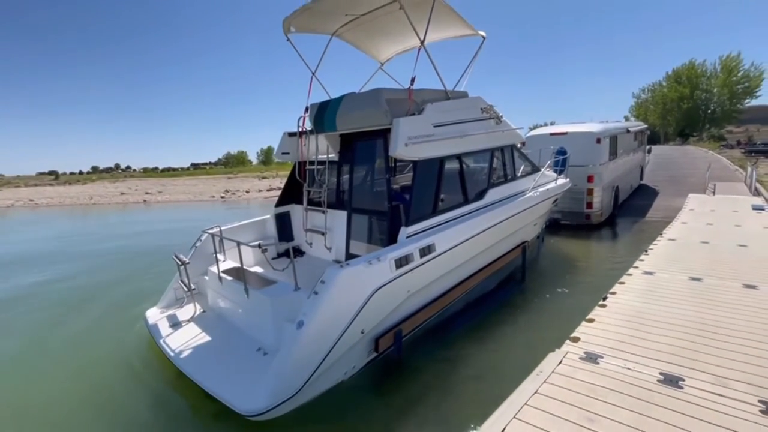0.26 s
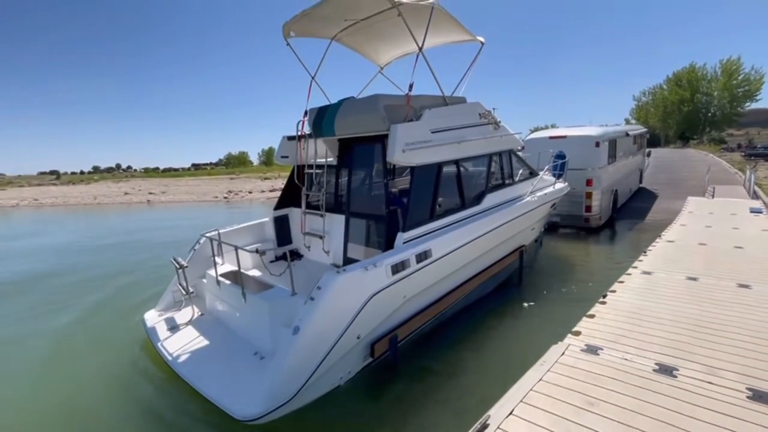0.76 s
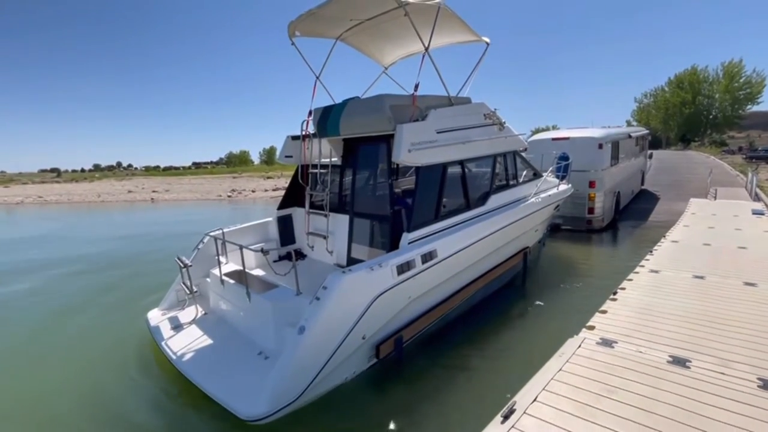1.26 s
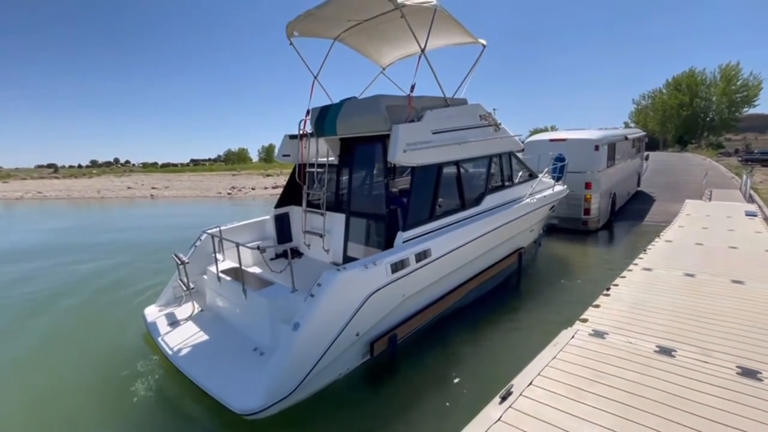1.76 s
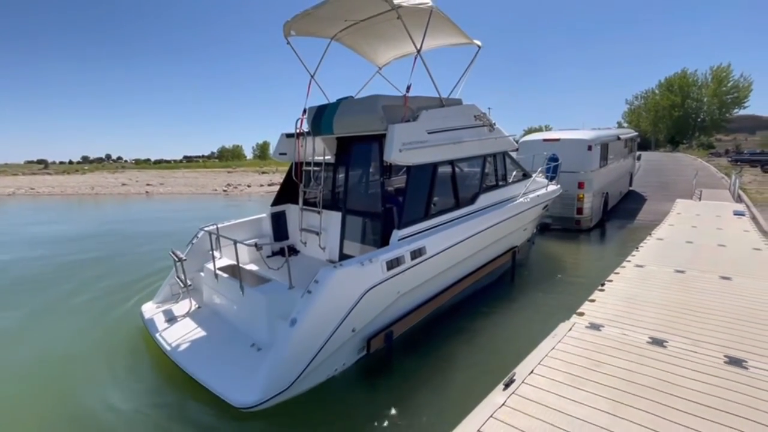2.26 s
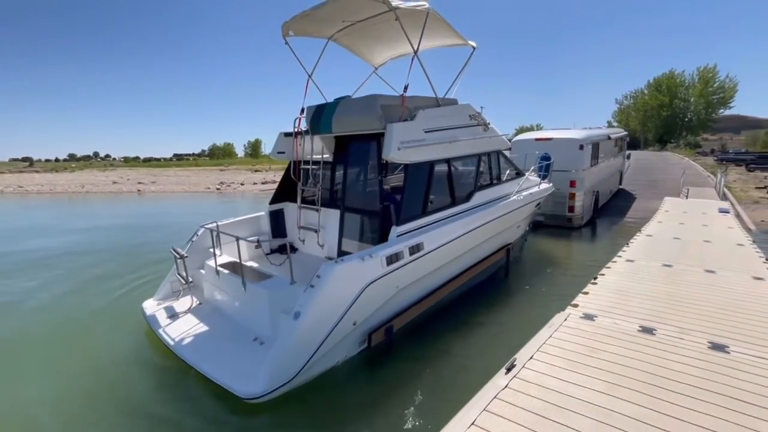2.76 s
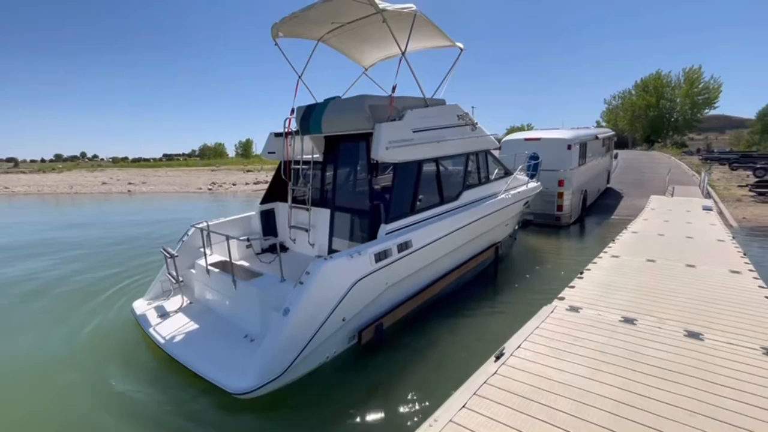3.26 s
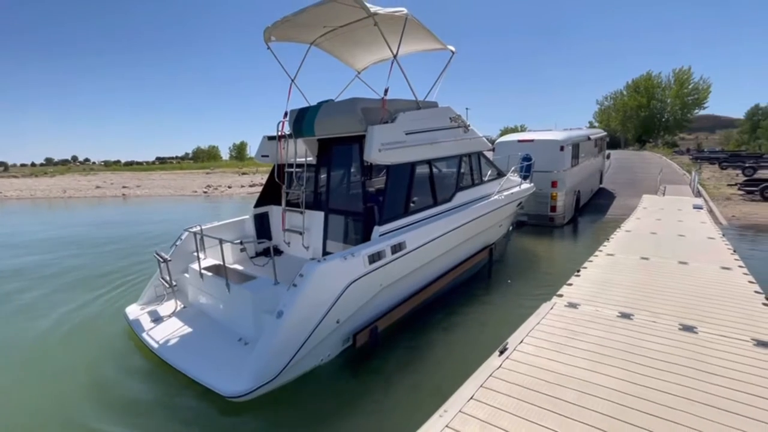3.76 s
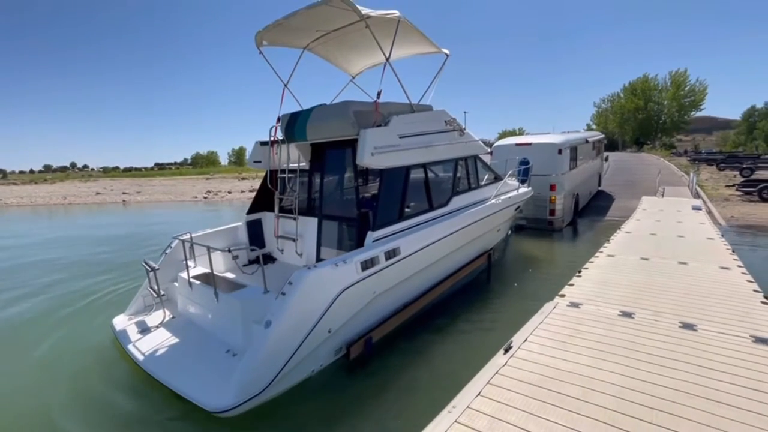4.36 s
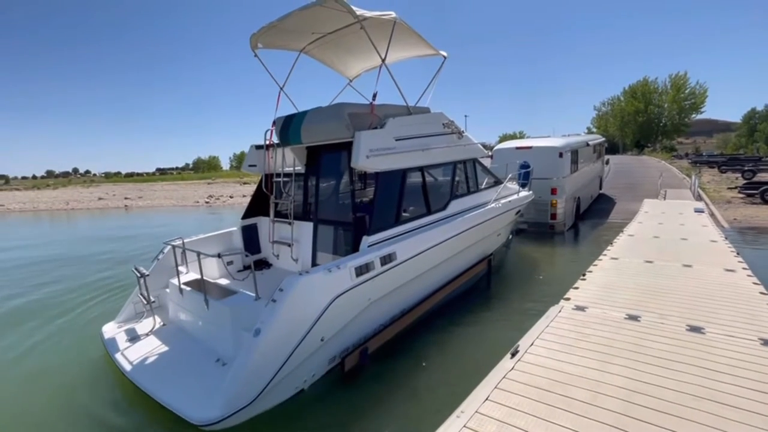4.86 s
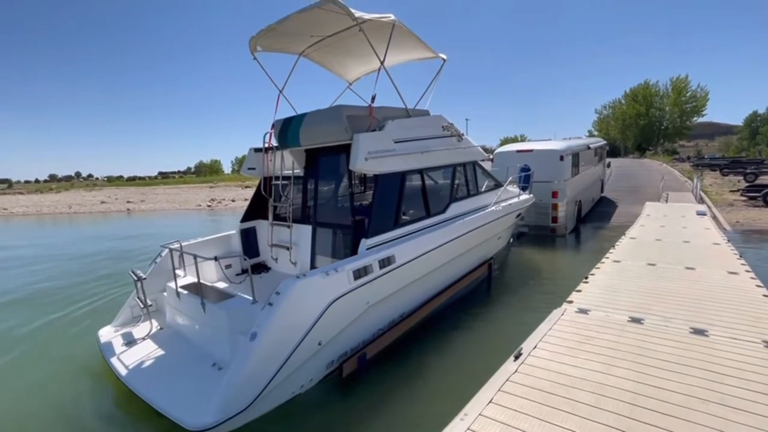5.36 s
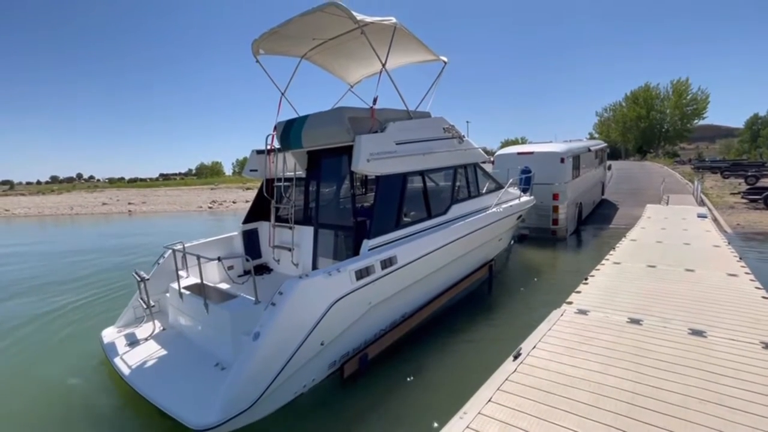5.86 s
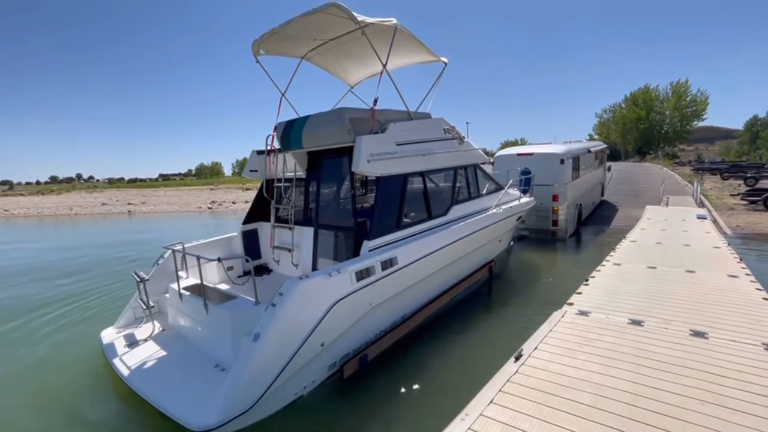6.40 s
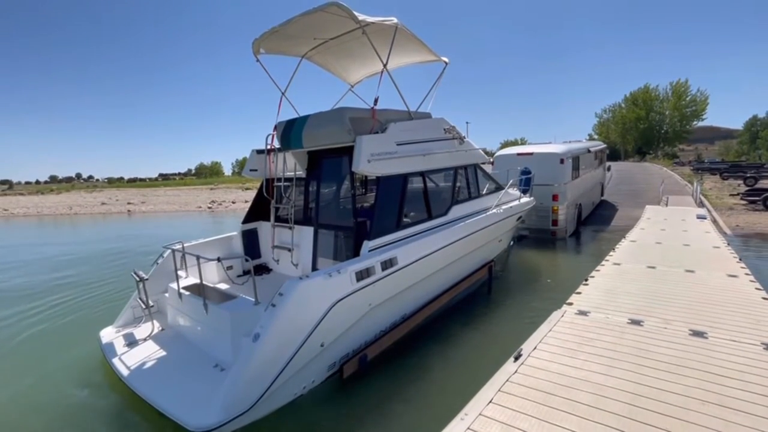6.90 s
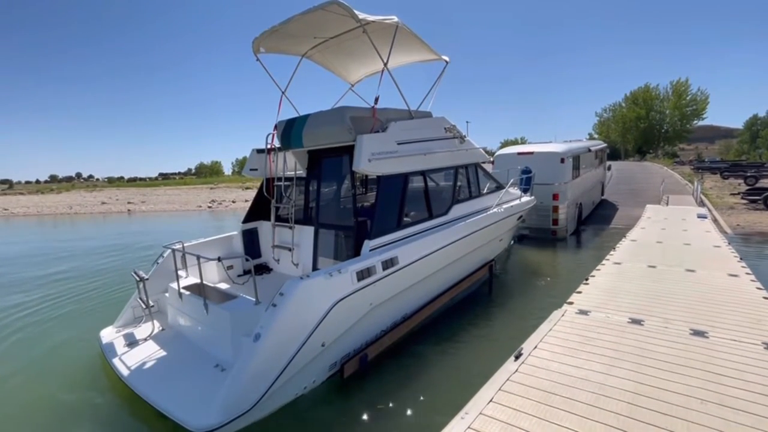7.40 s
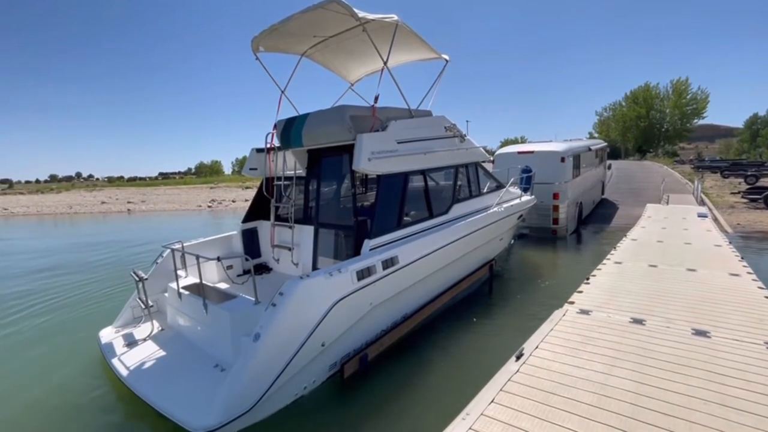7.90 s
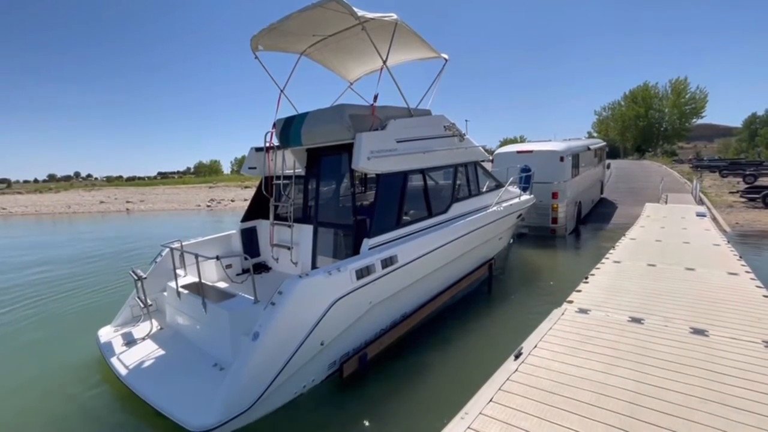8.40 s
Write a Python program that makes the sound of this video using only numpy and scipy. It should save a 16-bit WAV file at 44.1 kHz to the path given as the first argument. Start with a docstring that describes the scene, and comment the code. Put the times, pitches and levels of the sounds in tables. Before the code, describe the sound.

Outdoors by the water, a big engine keeps up a throbbing idle with mechanical clatter and fan hiss, joined by a pump's whine and a more distant vehicle's low mutter. About a third of the way in, air brakes nearby blast and squeal downward, followed by a few rough squeaks and another, steadier hiss. Water ticks faintly against a hull and loose metal rattles lightly before the engine slows and fades.

```python
"""A large engine idles fast at a boat ramp and runs down near the end, its six cylinders beating in the
exhaust over clatter and fan hiss. Farther up the ramp the tow vehicle mutters. A hydraulic pump whines,
loose fittings rattle and water ticks against the hull. An air brake dumps, its squeal falling with the
pressure; the linings rub and squeak, and a valve vents a second time.
Open air, heard through two closely spaced microphone ports."""
import sys
import numpy as np
from scipy import signal
from scipy.fft import rfft, irfft
from scipy.io import wavfile

SR = 44100
rng = np.random.default_rng(int(sys.argv[2]) if len(sys.argv) > 2 else 0)


def store_pcm(level_fs):
    """Save levels as 16-bit WAV."""
    pcm = np.round(np.clip(level_fs, -1, 1) * 32767).astype(np.int16)
    wavfile.write(sys.argv[1], SR, np.atleast_2d(pcm).T)


N = 381024
T = np.arange(N) / SR
HZ = np.fft.rfftfreq(N, 1 / SR)

# engine speed before the run-down: time_s, four_stroke_cycles_per_s
ENGINE_SPEED = [(0, 12.68), (2.65, 12.6895), (3.2, 12.8287), (4.2, 12.8347), (5.2, 12.7443), (7.7, 12.7401)]
# the six exhaust blows: place_in_cycle (0-1), strength (factor)
BLOWS = [(0.033, 0.58), (0.209, 0.85), (0.378, 0.71), (.537, 0.34), (0.712, 0.66), (0.874, 0.28)]
# load on the machinery, easing as the rig comes to rest: time_s, load_db
MACHINE_LOAD = [(0, 0), (1.3, -1.6), (2, -2.5), (2.8, -2), (4.5, -2), (5.3, -5.5), (6.5, -7.5), (8.64, -8)]
# noise of rubbing linings and rattling metal: frequency_hz, level_db, left_minus_right_db
METAL_SPECTRUM = [(900, -16.5, -3.5), (1300, 8.5, 10.5), (1900, -9.5, -17.5), (2390, 5, -9.5),
                  (2950, -10.5, -1.5), (3600, 1, 1.5), (4500, -9, 9.5), (5930, -18.5, 8), (10000, -53.5, 1)]
CLOSE_S, SHUT_S = 7.79, 0.03  # the throttle starts to close; time it takes to shut
DUMP_S, DUMP_RISE_S, DRAIN_S = 2.908, .067, .245  # brake valve opens; jet builds; pressure time constant


def amp(db):
    """Decibels as an amplitude factor."""
    return 10 ** (np.asarray(db) / 20)


def unit(x):
    """The signal scaled to rms 1."""
    return x / np.sqrt(np.mean(x ** 2) + 1e-20)


def curve(rows):
    """A table as a line through time."""
    return np.interp(T, *np.transpose(rows))


def since(start):
    """Seconds gone since a moment, zero before it."""
    return np.maximum(T - start, 0)


def progress(start, length):
    """Runs from 0 to 1 over an event."""
    return np.clip((T - start) / length, 0, 1)


def gate(start, length, attack, release):
    """Smooth attack, hold and release, timed in seconds."""
    fade_in = np.sin(np.pi / 2 * progress(start, attack))
    fade_out = np.cos(np.pi / 2 * progress(start + length - release, release))
    return (fade_in * fade_out) ** 2


def bell(peak_s, half_width_s):
    """A rounded swell of height 1."""
    return np.exp(-((T - peak_s) / half_width_s) ** 2)


def bursts(rows, rise_share=0.59):
    """Envelope of small events that swell quickly and die away."""
    return sum(amp(db) * np.exp(-np.maximum(T - s, (s - T) / rise_share) / decay)
               for s, db, decay in rows)


def wander(rate_hz):
    """Smooth random drift of rms 1."""
    return unit(irfft(rfft(rng.standard_normal(N)) * np.exp(-(HZ / rate_hz) ** 2), N))


def tone(hz, jitter, jitter_hz):
    """A sine of rms 1 whose pitch trembles."""
    trembling_hz = hz * (1 + jitter * wander(jitter_hz))
    return np.sqrt(2) * np.sin(2 * np.pi * np.cumsum(trembling_hz) / SR)


def colour(rows, column=1):
    """One column of a table across log frequency."""
    columns = np.transpose(rows)
    return np.interp(np.log(HZ + 1), np.log(columns[0] + 1), columns[column])


def shaped(x, spectrum):
    """The signal filtered by a spectrum, at rms 1."""
    return unit(irfft(rfft(x) * amp(colour(spectrum)), N))


def lift_db(bands):
    """Gain of a set of peaks and notches across frequency."""
    return sum(db * np.exp(-(2 * (HZ - centre) / width) ** 2) for centre, width, db in bands)


def ringing(x, modes):
    """Lifts the sound around each resonance."""
    return irfft(rfft(x) * amp(lift_db(modes)), N)


def reflected(x):
    """Short echoes comb the sound into narrow ridges."""
    # returns off hull, ramp and dock: delay_s, strength (factor)
    echoes = [(.0008, 0.14), (.0027, 0.25), (.0061, 0.23), (0.0112, .2), (.019, 0.16)]
    comb = 1 + sum(strength * np.exp(-2j * np.pi * HZ * delay) for delay, strength in echoes)
    return irfft(rfft(x) * comb, N)


def microphone(x, balance_db, diffuse=True):
    """The left side hears later and wide noise is only partly alike in the two; above about 11 kHz the two
    sides are made nearly the same."""
    # likeness and lag of left and right: frequency_hz, coherence (0-1), left_lag_rad
    likeness = [(0, .92, 0), (150, .97, .24), (400, .93, .62), (750, .88, 1.1), (1100, .87, 1.7),
                (1500, .85, 2.4), (2070, .7, 3), (2550, .67, 5.2), (4600, .6, 10.5), (6300, .5, 17.5),
                (8100, .45, 16.7), (11800, .99, 18.85)]
    hz, coherence, lag = np.transpose(likeness)
    right = rfft(x)
    left = right * np.exp(-1j * np.interp(HZ, hz, lag))
    if diffuse:
        alike = np.interp(HZ, hz, coherence)
        scattered = abs(right) * np.exp(2j * np.pi * rng.random(len(HZ)))
        left = alike * left + np.sqrt(1 - alike ** 2) * scattered
    tilt = amp(balance_db)  # left over right
    return irfft(np.array([left * tilt, right]) * np.sqrt(2 / (1 + tilt ** 2)), N)


def hiss(spectrum):
    """Coloured noise with its echoes, rms 1 across left and right."""
    noise = shaped(reflected(rng.standard_normal(N)), spectrum)
    return microphone(noise, colour(spectrum, column=2))


def load_db(full_load_db, db_per_load_db):
    """A layer's level as it follows the load."""
    return full_load_db + db_per_load_db * curve(MACHINE_LOAD)


def run_down_db(step_db=-3.5, fade_db_per_s2=-11.5):
    """The engine drops a step as the throttle shuts, then fades ever faster."""
    return step_db * progress(CLOSE_S, SHUT_S) + fade_db_per_s2 * since(CLOSE_S) ** 2


def dip_db():
    """The level of both engines dips briefly."""
    return -4.5 * bell(peak_s=3.166, half_width_s=0.22)


def exhaust(cycles, pipe_echo=0.067, loose_db=-32, bark_db=-22, bark_width_cycles=0.013):
    """Six unequal push-pull blows a cycle set the phase of each order; the pipe sets its strength."""
    # what the pipe lets out: multiple_of_cycle_rate, level_db
    orders = [(3, -48.5), (4, -50), (5, -45), (6, -41.5), (7, -82.5), (9, -32.5), (10, -49.5), (11, -38),
              (12, -19.5), (13, -31), (14, -39), (15, -39.5), (16, -30.5), (17, -39.5), (18, -32.5),
              (19, -37.5), (20, -48.5), (21, -37.5), (22, -31.5), (23, -30), (24, -46), (25, -36.5),
              (26, -45.5), (27, -50), (28, -68), (30, -52), (31, -59.5), (33, -54), (34, -55.5), (35, -43),
              (36, -66), (37, -63.5)]
    place, strength = np.transpose(BLOWS)
    crank = cycles + 0.0025 * wander(52)  # uneven timing
    loose = np.minimum(0.31 * since(CLOSE_S), 1)  # without drive the boom drains and the orders even out
    drone = np.zeros(N)
    for k, db in orders:
        blows = 1j * np.sum(strength * np.exp(-2j * np.pi * k * place))
        blows *= 1 + pipe_echo * np.exp(-1j * np.pi * k / len(place))  # each returns halfway to the next
        level = amp(db + loose * (loose_db - db))
        drone += np.sqrt(2) * level * np.cos(2 * np.pi * k * crank + np.angle(blows))
    drone *= amp(load_db(-0.35, 0.018) + run_down_db() + dip_db() + 0.25 * wander(55))
    # one cylinder still barks after the throttle shuts
    offset = ((crank - place[2] + .5) % 1 - .5) / bark_width_cycles
    bark = -offset * np.exp((1 - offset ** 2) / 2) * amp(bark_db) * progress(CLOSE_S, SHUT_S)
    return microphone(drone + bark, balance_db=-2.9, diffuse=False)


def clatter(cycles, repeat_share=0.73, throb=0.019, sway=.09, lag_cycles=0.073):
    """Valve gear and gas rush, partly repeating each cycle, swell with each firing and crank turn."""
    # mechanical noise: frequency_hz, level_db
    spectrum = [(300, -30), (450, 0), (580, -12), (690, -3.5), (750, -2), (815, 0), (930, 0.5),
                (1060, -6.5), (1200, -7), (1400, -7), (1750, -11), (2100, -15), (4000, -32), (8000, -48)]
    pattern = rng.standard_normal(round(SR / ENGINE_SPEED[0][1]))
    gear_slack = .0012 * wander(9)
    locked = np.interp((cycles + gear_slack) % 1, np.linspace(0, 1, len(pattern)), pattern)
    drive = repeat_share * unit(locked) + (1 - repeat_share) * reflected(rng.standard_normal(N))
    firing = np.cos(2 * np.pi * len(BLOWS) * (cycles - BLOWS[0][0] - lag_cycles))
    crank = np.cos(4 * np.pi * (cycles - BLOWS[2][0]))
    db = load_db(-36, 0.31) + 0.56 * run_down_db() + 0.47 * dip_db() + 0.8 * wander(15)
    swell = (1 + throb * firing + sway * crank) * amp(db)
    return microphone(shaped(drive, spectrum), balance_db=-6) * swell


def cooling_wash(cycles, throb=0.11):
    """Fan and cooling water hiss, pulsing lightly with each crank turn."""
    # the hiss: frequency_hz, level_db, left_minus_right_db
    spectrum = [(500, -3, 31), (1320, 6, 21), (2220, 1, 5.5), (2850, -2, 2.5), (4300, 2, 4.5),
                (4500, -8, 7), (4770, -7, -1.5), (5440, -10.5, 23.5), (6730, -4.5, 6), (7840, -24.5, -6.5),
                (7680, -9, 5), (9820, -18.5, -4), (11000, -35.5, 6), (14400, -29.5, 7.5), (16000, -39, -5)]
    pulse = 1 + throb * np.cos(4 * np.pi * (cycles - .25))
    return hiss(spectrum) * pulse * amp(load_db(-41.5, 0.89) + 0.38 * run_down_db() + .5 * wander(28))


def engine(slowing_hz_per_s=3.81):
    """One crank drives exhaust, clatter and wash, losing speed evenly once the throttle closes."""
    # resonances of the engine covers: centre_hz, width_hz, gain_db
    covers = [(660, 66, 1.5), (866, 50, 1), (1040, 110, 3.5), (1700, 70, 0.5), (3063, 240, 5)]
    cycles = np.cumsum(curve(ENGINE_SPEED) - slowing_hz_per_s * since(CLOSE_S)) / SR
    return exhaust(cycles) + ringing(clatter(cycles) + cooling_wash(cycles), covers)


def tow_engine(rumble_db=-33, waver_db=0.5):
    """A slower engine farther up the ramp: wavering low tones in a rumble."""
    # tones of its idle: pitch_hz, level_db
    idle_tones = [(46, -46.5), (59.5, -37.5), (76, -38.5), (91.5, -37.5), (120, -36)]
    # its rumble: frequency_hz, level_db
    spectrum = [(15, -31.5), (28, -26.5), (42, -12), (62, -8), (100, -16), (130, 9.5), (230, -3), (310, 8),
                (365, -0.5), (450, -9.5), (560, -15), (1200, -73.5)]
    idle = sum(amp(db) * tone(hz, jitter=0.01385, jitter_hz=7.4) * amp(waver_db * wander(4))
               for hz, db in idle_tones)
    idle *= amp(load_db(0.45, 0.24) + dip_db())
    rumble = amp(rumble_db) * shaped(rng.standard_normal(N), spectrum)
    return microphone(idle, balance_db=-4, diffuse=False) + microphone(rumble, balance_db=-1)


def tow_fan():
    """Air from the tow vehicle's fan makes a hollow rush while the vehicle is loaded."""
    # broad resonances: centre_hz, width_hz, gain_db
    resonances = [(775, 170, 0), (906, 140, -0.5), (1735, 200, -3), (2800, 150, -10)]
    gain = sum(amp(db) * np.exp(-2 * ((HZ - hz) / width) ** 2) for hz, width, db in resonances)
    air = unit(irfft(rfft(rng.standard_normal(N)) * gain, N))
    return microphone(air, balance_db=-3) * amp(load_db(-35, 3.7) + 1.6 * wander(11))


def pump(edge_s=0.23, creep_power=1.5):
    """A hydraulic pump sings while it is loaded: each whine swells, eases and creeps up in pitch."""
    # whines, the middle one faint: start_s, length_s, first_hz, last_hz, level_db, swell_db, jitter_share
    whines = [(-.2, 1.6, 407.7, 415.6, -27, 3.5, 0.0024), (1.295, 1.87, 422, 445, -38, 5.5, .03),
              (3.748, 2, 394, 408.4, -26.5, 10, .0022)]
    singing = np.zeros(N)
    for start, length, first_hz, last_hz, db, swell_db, jitter in whines:
        along = progress(start, length)
        hz = first_hz + (last_hz - first_hz) * along ** creep_power
        envelope = gate(start, length, edge_s, edge_s) * amp(db - swell_db * np.cos(np.pi * along) ** 2)
        singing += tone(hz, jitter, jitter_hz=22.1) * envelope
    return microphone(singing * amp(1.2 * wander(40)), balance_db=-.5, diffuse=False)


def fittings(chatter_db=3.4):
    """Loose metal chatters briefly."""
    # rattles: peak_s, level_db, decay_s
    rattles = [(.29, -46, .035), (.55, -43, .07), (6.8, -48, .025), (7.225, -50, .012), (8.232, -43, .016),
               (8.29, -42.5, .012), (8.378, -47, .014)]
    return hiss(METAL_SPECTRUM) * bursts(rattles) * amp(chatter_db * wander(150))


def water(spatter_db=3.4):
    """Small splashes tick against the hull."""
    # splashes: peak_s, level_db, decay_s
    ticks = [(1.147, -46, .0044), (1.229, -51, .008), (1.554, -49, .0035), (2.308, -53, .035),
             (2.513, -43.5, .006), (2.573, -48, .014), (7.735, -58, .025)]
    # their spray: frequency_hz, level_db, left_minus_right_db
    spectrum = [(3000, -23, 4), (6500, 7, 6), (9000, -0.5, 0), (12000, -10, -6), (14500, -2, 2),
                (16000, -15, -5)]
    return hiss(spectrum) * bursts(ticks) * amp(spatter_db * wander(400))


def air_dump(blast_db=-24.5, leak_db=-35.5, leak_db_per_s=-14):
    """The brake valve opens: the jet hisses and squeals as pressure drains, and a slower leak lingers."""
    # the jet: frequency_hz, level_db, left_minus_right_db
    spectrum = [(400, -38, -13), (900, -12, 18.5), (2200, -5.5, -10), (2760, -4.5, 2.5), (4260, -0.5, 6),
                (4760, -3, -1), (5700, -9.5, 6), (6050, 5.5, 15), (7740, -10.5, -8.5), (7900, 3, 4.5),
                (11100, -8, -14), (12000, -13.5, 7), (14300, -6.5, 2.5), (15500, -19.5, 0)]
    opened, draining_s = progress(DUMP_S, DUMP_RISE_S), since(DUMP_S + DUMP_RISE_S)
    air_left = np.exp(-draining_s / DRAIN_S)
    blast = amp(blast_db) * air_left ** 1.45
    leak = amp(leak_db + leak_db_per_s * draining_s)
    jet = hiss(spectrum) * opened * (blast + leak) * amp(0.55 * wander(40))
    return jet + valve_squeal(opened ** 1.6 * air_left, air_left)


def valve_squeal(pressure, air_left, empty_hz=511, full_hz=895, length_s=.71, flutter_db=1.1):
    """Pitch and strength sink with the pressure; the partials sweep through fixed peaks and notches."""
    # harmonics before colouring; the octave speaks first, the others need a full jet: level_db, late_s
    partials = [(-30.5, 0.028), (-30, 0.0062), (-36, 0.043), (-42.5, 0.025)]
    # peaks and notches where the gliding squeal flares or breaks: centre_hz, width_hz, gain_db
    squeal_colour = [(560, 70, -12), (700, 55, 7), (735, 14, -4), (785, 40, 13.5), (887, 117, 20),
                     (1173, 170, 10.5), (1220, 33, -11), (1265, 29, 9.5), (1335, 13, -9), (1445, 144, 12),
                     (1750, 180, 14.5), (1900, 60, 15), (2550, 180, 5.5), (3380, 160, 2)]
    hz = empty_hz + (full_hz - empty_hz) * pressure
    jitter = .006 + .028 * pressure  # the harder the jet, the rougher the squeal
    phase = 2 * np.pi * np.cumsum(hz * (1 + jitter * wander(530))) / SR
    colour_db, squeal = lift_db(squeal_colour), np.zeros(N)
    for k, (db, late) in enumerate(partials, 1):
        envelope = gate(DUMP_S + late, length_s - late, attack=.022, release=.11)
        level = amp(db + np.interp(k * hz, HZ, colour_db))
        squeal += np.sqrt(2) * level * envelope * np.sin(k * phase)
    squeal *= air_left ** 0.92 * amp(flutter_db * wander(93))
    return microphone(reflected(squeal), balance_db=-6.5, diffuse=False)


def brake_shoes(chatter_db=1.5):
    """Linings rub on the drums and catch into rough squeaks, which arch in pitch and level."""
    # swells of drag: peak_s, half_width_s, level_db
    drags = [(4.02, 0.19, -42), (4.5, 0.16, -44.5), (4.9, .22, -43.5)]
    # squeaks: start_s, length_s, first_hz, last_hz, arch_hz, level_db, overtone_db
    catches = [(3.967, 0.29, 1286, 1300, 7.5, -41.5, -9), (4.123, .34, 2830, 2750, 180, -40.5, -27),
               (4.41, 0.157, 1200, 1193, 3.7, -47, 1), (4.853, .21, 1168, 1135, 13.7, -33, -18)]
    rub = hiss(METAL_SPECTRUM) * sum(amp(db) * bell(s, width) for s, width, db in drags)
    squeaks = np.zeros(N)
    for start, length, first_hz, last_hz, arch_hz, db, overtone_db in catches:
        along = progress(start, length)
        arch = np.sin(np.pi * along)
        hz = first_hz + (last_hz - first_hz) * along + arch_hz * arch
        overtones = sum(tone(k * hz, jitter=0.0081, jitter_hz=205) for k in (2, 3))
        fundamental = tone(hz, jitter=0.0177, jitter_hz=213)
        squeaks += amp(db) * arch * (fundamental + amp(overtone_db) * overtones)
    return (rub + microphone(squeaks, balance_db=-4.3, diffuse=False)) * amp(chatter_db * wander(44))


def air_vent(start_s=5.63, level_db=-32.5, growth_db_per_s=4):
    """A second release of air rings in its pipe and grows slightly louder before it stops."""
    # the escaping air: frequency_hz, level_db, left_minus_right_db
    spectrum = [(1960, -5.5, -0.5), (2200, -5, -4), (3670, -4, 2), (4300, -3.5, 2), (4800, -5.5, 0),
                (5400, -8, 10), (6360, 0, 11), (7080, 0.5, 3), (7440, -17, -1), (7800, -3.5, 9),
                (9280, -9.5, -7), (12000, -20, 9), (14200, -10, 0), (15500, -17.5, 3)]
    # resonances of the pipe: centre_hz, width_hz, gain_db
    pipe = [(3600, 200, 2.5), (5070, 190, 6.1), (6350, 300, 2.2), (8050, 240, 4.2)]
    envelope = gate(start_s, length=0.732, attack=0.057, release=0.24)
    db = level_db + growth_db_per_s * since(start_s) + 0.55 * wander(40)
    return ringing(hiss(spectrum), pipe) * envelope * amp(db)


def scene():
    """The ramp at the microphone: the engine, the tow vehicle beyond it, the water and the brakes."""
    machinery = engine() + tow_engine() + tow_fan() + pump() + fittings()
    return machinery + water() + air_dump() + brake_shoes() + air_vent()


def record(dry, knee=.65, headroom=.25, edge_hz=15750):
    """The recorder rounds off only the highest peaks, then cuts the top of the treble."""
    held = np.clip(dry, -knee, knee)
    rounded = held + headroom * np.tanh((dry - held) / headroom)
    lowpass = signal.firwin(511, edge_hz, window=("kaiser", 9), fs=SR)
    return signal.oaconvolve(rounded, lowpass[None], "same")


dry = scene()
out = record(dry)
store_pcm(out)
```